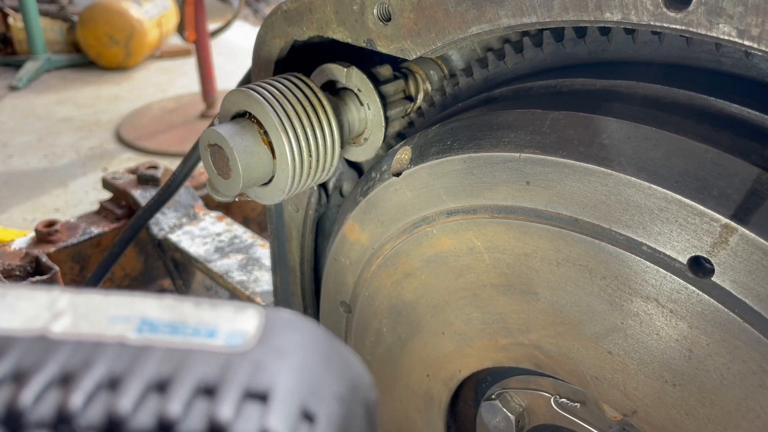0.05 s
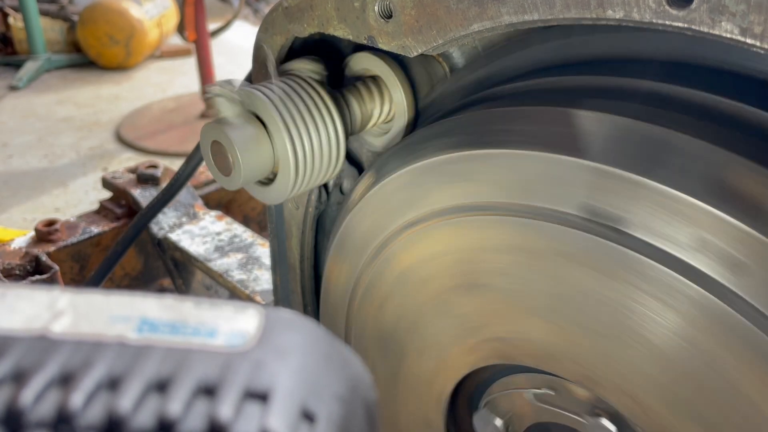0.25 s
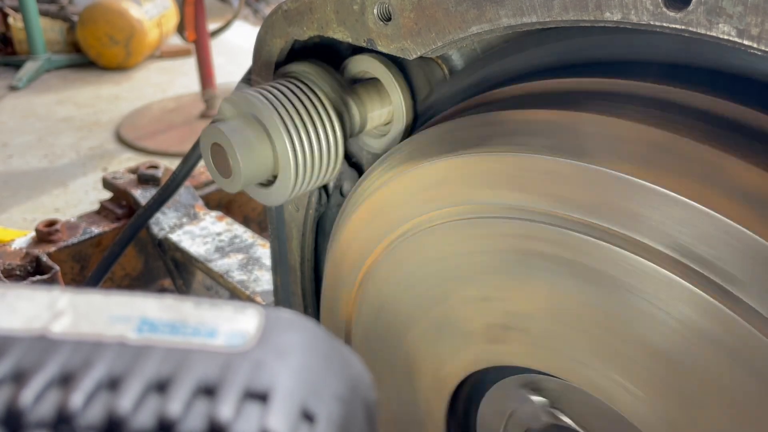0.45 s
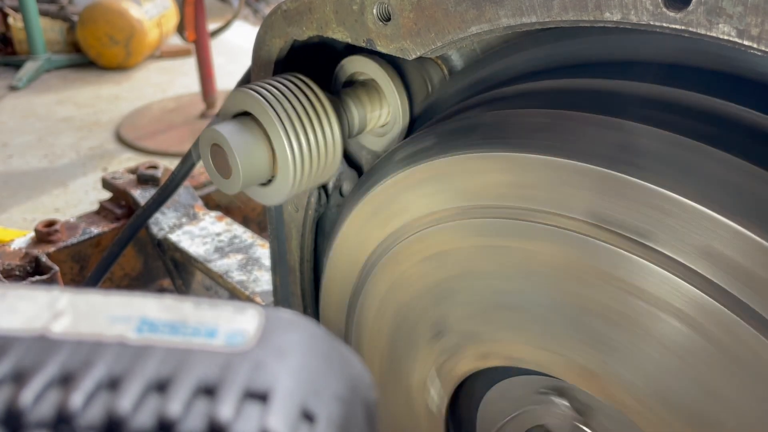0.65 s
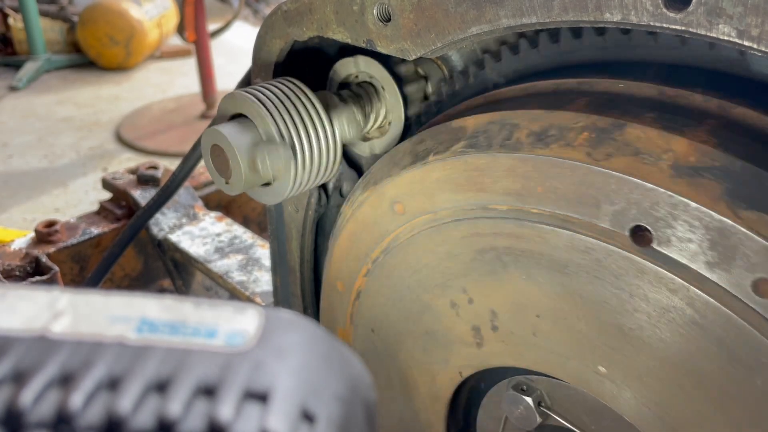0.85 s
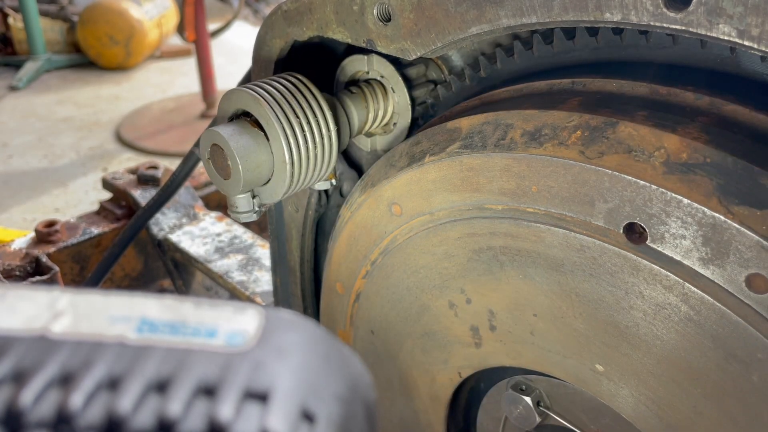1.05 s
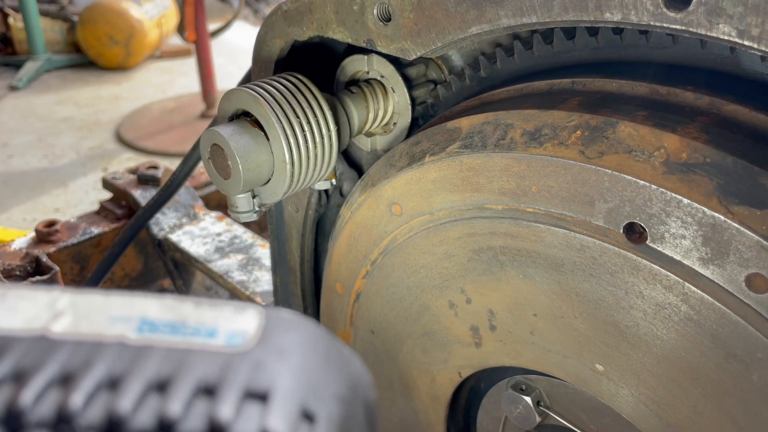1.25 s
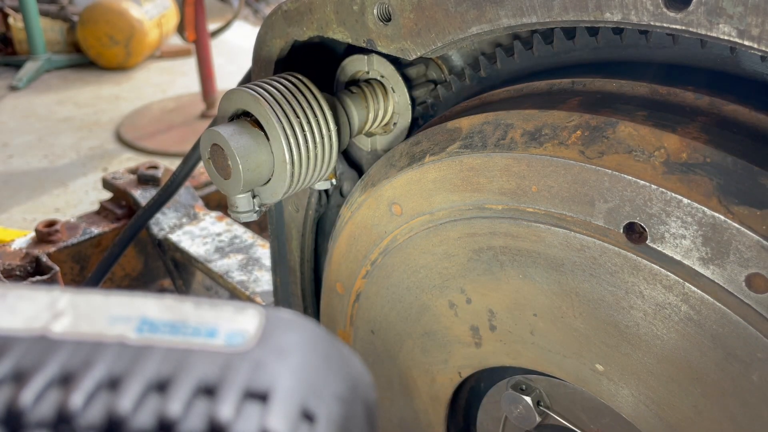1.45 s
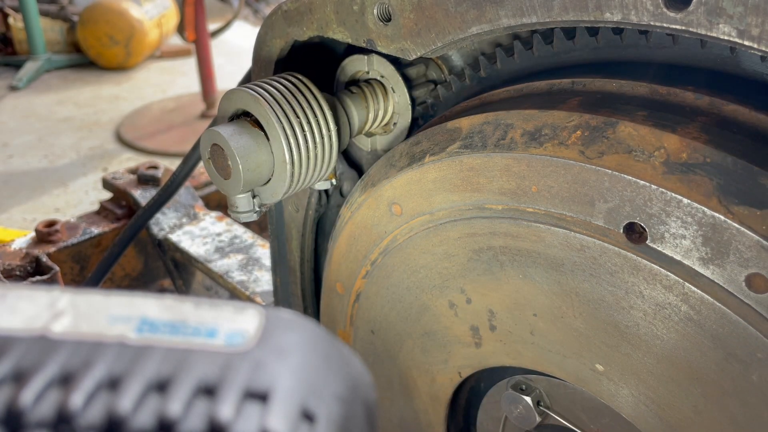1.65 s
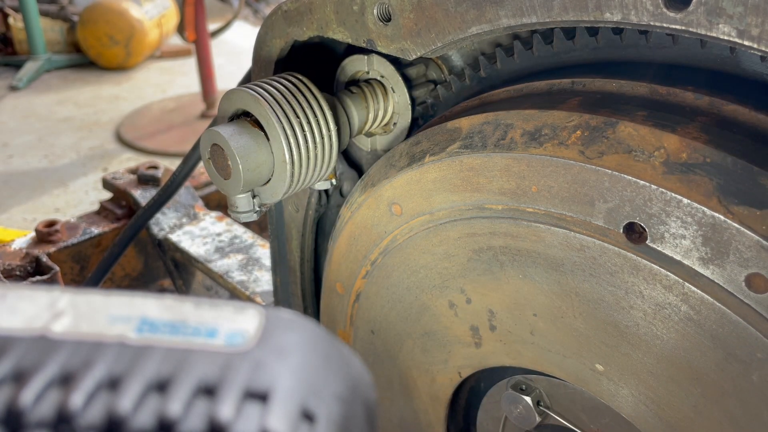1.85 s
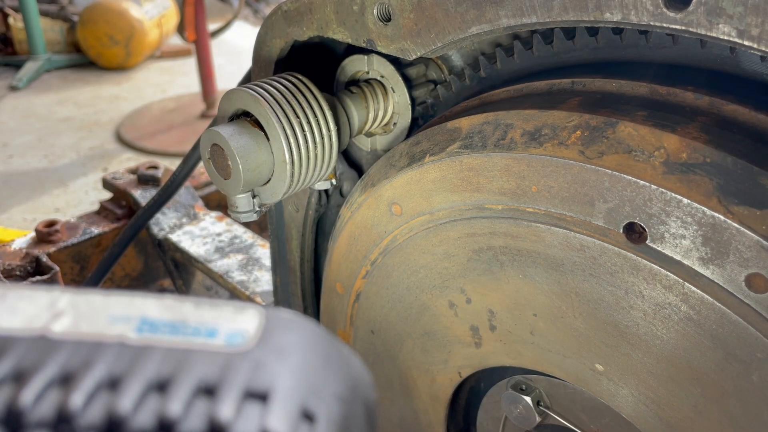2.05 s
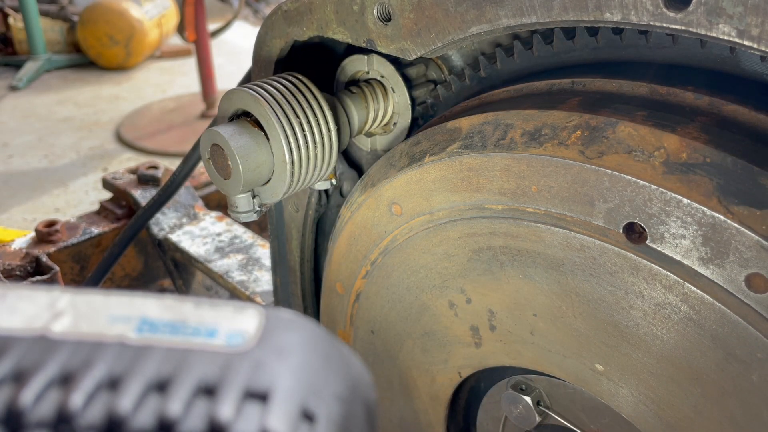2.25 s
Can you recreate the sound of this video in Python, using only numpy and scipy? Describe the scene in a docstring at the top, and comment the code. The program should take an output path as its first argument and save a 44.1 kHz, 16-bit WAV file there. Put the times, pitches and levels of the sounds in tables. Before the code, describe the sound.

An engine starter slams into a flywheel with a sharp metal clank and thud, grinds and whines for half a second, then disengages with a rattling clack. Heard close up in a workshop, over a faint distant rumble.

```python
"""An inertia starter on a bare engine in a workshop, heard from close by.
The motor kicks; its pinion slams into the ring gear with a clank and a falling thud.
The teeth grind, whine and set the steel singing, then the pinion is thrown back with a
rattling clack and the stand shudders. The room rings out over a dull, distant rumble."""
import sys
import numpy as np
from scipy import signal
from scipy.fft import rfft, irfft
from scipy.io import wavfile
from scipy.ndimage import uniform_filter1d

SR = 44100
rng = np.random.default_rng(int(sys.argv[2]) if len(sys.argv) > 2 else 0)


def digitize_waveform(pressure):
    """Quantize a signal to 16-bit integers and store it at the path in sys.argv[1].

    Rows of a 2-D input are taken as channels; values are limited to [-1, 1].
    """
    field = np.atleast_2d(pressure).T
    bounded = np.clip(field, -1, 1)
    quanta = np.round(bounded * 32767).astype(np.int16)
    wavfile.write(sys.argv[1], SR, quanta)


N = 105840
T = np.arange(N) / SR

# rumble spectrum: freq_hz, relative_db
RUMBLE_COLOUR = [(20, -25.5), (32, -15), (60, -3.5), (105, -2.5), (160, -2.5), (260, -11), (380, -23),
                 (520, -19), (800, -8.5), (1100, -17.5), (1500, -28.5), (2200, -38.5), (5000, -49.5),
                 (16000, -66.5)]
# rumble envelope: time_s, level_db
RUMBLE_LEVEL = [(0, -53.5), (.17, -54.5), (1.0, -62.5), (1.75, -66), (2.0, -63), (2.2, -58), (2.4, -62.5)]
# rumble stereo width: freq_hz, side_to_mid_db
RUMBLE_WIDTH = [(60, -23), (250, -8), (800, 0.5), (3000, -3)]
# room tail spectrum: freq_hz, relative_db
ROOM_TAIL_COLOUR = [(70, -1.5), (130, 6.5), (220, 10), (320, 13.5), (520, 6), (900, 2.5), (1900, -5),
                    (3000, -2.5), (6000, 2.5), (11000, 0), (16000, -12)]
# starter stereo width: freq_hz, side_to_mid_db
STARTER_WIDTH = [(60, -25), (250, -16.5), (600, 0), (1200, -9), (2200, -11), (5000, -12), (12000, -19.5)]
# microphone balance: freq_hz, left_minus_right_db
MIC_PAN = [(100, -1), (350, 2), (800, 2.5), (1200, 1.5), (2100, 6.5), (3300, 4.5), (5500, 1.5),
           (9000, -0.5)]
# microphone phase: freq_hz, left_lead_rad
MIC_LEAD = [(60, 0), (650, 0.6), (1200, -0.48), (2300, -5.34), (3300, 2.36), (4000, -0.05), (5200, 0.37),
            (7200, -3.5), (11000, -5.5), (14600, -11.5)]
# stand shudder spectrum: freq_hz, relative_db
STAND_COLOUR = [(60, -30), (130, -11.5), (175, -1), (290, 2), (370, -6), (520, -17), (900, -22),
                (2000, -50)]
# frame shake envelope: time_s, level_db
FRAME_LEVEL = [(0, -60), (.19, -58), (.26, -37.5), (.35, -47), (.48, -51), (.55, -61.5), (.63, -60),
               (.76, -70), (.8, -55.5), (.85, -55), (.93, -81)]
# frame shake spectrum: freq_hz, relative_db
FRAME_COLOUR = [(20, -13.5), (40, -3), (56, 6.5), (85, -11), (150, -20.5), (300, -45.5)]
# motor kick spectrum: freq_hz, relative_db
MOTOR_COLOUR = [(60, -21.5), (200, -10), (420, -7.5), (600, -6.5), (850, -2.5), (1150, 3), (1500, -10),
                (2400, -22.5), (6000, -44.5)]
# gear and casting modes: freq_hz, relative_db, t60_s
STEEL_MODES = [(215, -10, 0.61), (400, -16, .09), (802, -8.5, .07), (945, -10.5, 0.11), (1183, -8.5, .25),
               (1302, -6.5, 0.1), (1471.6, -27, .8), (1575, -7.5, .05), (1700, -8, .05), (2108, -6, .09),
               (2307, -2, .04), (2565, -6.5, 0.035), (2862, -12, .14), (3370, -1.5, 0.08), (3875, -11, .05),
               (4460, -6.5, 0.057)]
# steel blows: start_s, crack_db, chatter_decay_s, knock_db
PINION_BLOWS = [(0.2235, -11, 0.0045, -18), (0.2291, -14, 0.0013, -16.5), (0.2358, -26.5, 0.0024, -23),
                (0.2517, -26.5, 0.0033, -38), (.2692, -14, .0015, -26), (0.5537, -28, 0.0022, -24.5),
                (0.5641, -29.5, 0.0013, -28.5), (.6445, -37, 0.0022, -37), (0.7029, -44.5, .004, -33),
                (0.7435, -19, .005, -20.5), (0.7482, -26.5, 0.0035, -27), (.7665, -31, .007, -26.5),
                (0.7808, -40.5, 0.0017, -34.5)]
# bright spectrum of a blow: freq_hz, relative_db
BLOW_CRACK_COLOUR = [(200, -20.5), (1000, 3), (2200, 2.5), (3000, 2), (3700, -3), (6000, -2), (8500, -1),
                     (11000, 1), (13000, -5.5), (16000, -17)]
# dull spectrum of a blow: freq_hz, relative_db
BLOW_KNOCK_COLOUR = [(50, -33.5), (170, -6.5), (350, -7.5), (560, -10.5), (950, 6.5), (1250, 1.5),
                     (1600, -5), (2300, -7.5), (4000, -31), (9000, -51)]
# singing envelopes: time_s, low_mode_db, high_mode_db
SINGING_LEVELS = [(.185, -69, -82), (.205, -27.5, -34.5), (.25, -39, -43.5), (.29, -35, -38.5),
                  (.35, -39, -33.5), (.402, -30, -21.5), (.418, -35, -41), (.44, -26.5, -30),
                  (.485, -33, -31), (.54, -42, -37), (.585, -23.5, -34.5), (.64, -38.5, -40),
                  (.66, -42, -55.5), (.695, -36.5, -60.5), (.714, -41, -33), (.745, -43.5, -38.5),
                  (.84, -48, -56.5), (1.0, -109, -109)]
# singing modes: pitch_hz, relative_db, high_envelope_share, wander_hz
SINGING_MODES = [(1169, -4, 0, 11.6), (2877, -5.5, 1, 9), (2895, -5, 1, 16), (3300, -6.5, 0.9, 9.8)]
# mesh whine partials: tooth_rate_multiple, relative_db
WHINE_PARTIALS = [(1, -9), (2, -12), (3, -10), (4, -10), (5, -6), (6, -6), (8, -14), (11, -15)]
# gear speed: time_s, tooth_rate_hz
TOOTH_RATE = [(.18, 300), (.25, 375), (.325, 392), (.37, 411), (.405, 414), (.452, 368), (.49, 402),
              (.515, 408), (.56, 376), (0.601, 393), (0.751, 370)]
# tooth contact envelopes: time_s, load_db, scrape_db
CONTACT_LEVELS = [(.182, -70, -79.5), (.2, -32, -31), (.218, -35, -40), (.25, -44, -46),
                  (.285, -33.5, -37.5), (.33, -28, -37), (.38, -27.5, -33), (.46, -30.5, -38.5),
                  (.495, -33.5, -38.5), (.512, -28, -34), (.538, -48, -51.5), (.57, -22.5, -33),
                  (.592, -35, -45.5), (.625, -47, -52.5), (.646, -41, -48), (.68, -55, -52),
                  (.705, -45, -52), (.74, -49, -41), (.79, -73, -74.5)]
# grinding spectrum: freq_hz, relative_db
TOOTH_GRIND_COLOUR = [(60, -24), (190, -21), (290, -7), (400, -4), (570, -14), (800, -2), (1080, 3),
                      (1420, -6), (1600, 0), (1800, -1), (2070, 1), (2280, 2), (2560, -3), (3300, -7),
                      (4200, -20), (8000, -45)]
# scraping spectrum: freq_hz, relative_db
TOOTH_SCRAPE_COLOUR = [(1500, -39.5), (3500, -8.5), (4500, 3.5), (5500, 2.5), (7000, 0), (9000, -2),
                       (11000, 2.5), (13000, -6), (16000, -26)]


def from_db(db):
    """Decibels to gain."""
    return 10 ** (np.asarray(db) / 20)


def unit_rms(x):
    """Scale to unit rms."""
    return x / np.sqrt(np.mean(x ** 2) + 1e-20)


def per_sample(rows):
    """Columns of a time table, interpolated per sample."""
    time_s, *columns = np.transpose(rows)
    return [np.interp(T, time_s, column) for column in columns]


def envelopes(rows):
    """Level columns as gains, fading after the last row."""
    fade = np.exp(-np.maximum(T - rows[-1][0], 0) * 20)
    return [from_db(db) * fade for db in per_sample(rows)]


def per_bin(rows):
    """A frequency table on the bins of a double-length FFT."""
    hz, value = np.transpose(rows)
    bin_hz = np.maximum(np.arange(N + 1) * SR / (2 * N), 1)
    return np.interp(np.log(bin_hz), np.log(hz), value)


def colour(x, spectrum):
    """Minimum-phase filter; white input keeps its power."""
    cepstrum = irfft(np.log(unit_rms(from_db(per_bin(spectrum)))))
    cepstrum[1:N] *= 2
    cepstrum[N + 1:] = 0
    return irfft(rfft(x, 2 * N) * np.exp(rfft(cepstrum)))[..., :N]


def stereo_noise(width=STARTER_WIDTH):
    """White mid/side noise, its width set per frequency."""
    mid, side = rng.standard_normal((2, N))
    side_gain = from_db(per_bin(width))
    both = rfft(mid, 2 * N) + side_gain * rfft(side, 2 * N) * [[1], [-1]]
    return irfft(both / np.sqrt(1 + side_gain ** 2))[:, :N]


def drift(rate_hz=70):
    """Smooth random motion, unit rms."""
    pole = np.exp(-2 * np.pi * rate_hz / SR)
    smooth = signal.lfilter([1], [1, -2 * pole, pole * pole], rng.standard_normal(2 * N))
    return unit_rms(smooth[N:])


def levelled(x, window_samples=900):
    """Hold the running rms at one."""
    power = np.mean(np.atleast_2d(x) ** 2, axis=0)
    return x / np.sqrt(uniform_filter1d(power, window_samples) + 1e-9)


def decaying(noise, t60_s):
    """Exponential noise decay, unit energy."""
    return unit_rms(noise * from_db(-60 * np.minimum(T / t60_s, 4))) / np.sqrt(N)


def convolve(x, response):
    """Apply a stereo impulse response."""
    return signal.fftconvolve(np.atleast_2d(x), response, axes=1)[:, :N]


def dense_ring(x, spectrum, ring_s, taps=4096):
    """Excite a short, whitened stereo noise decay, then colour it."""
    response = decaying(stereo_noise(), ring_s)[:, :taps]
    for _ in range(4):
        bins = rfft(response, 2 * taps)
        response = irfft(bins / (np.abs(bins) + 1e-12))[:, :taps] * (T[:taps] < ring_s)
    return colour(convolve(x, response), spectrum)


def distant_rumble(crossover_hz=340, rush_db=-66):
    """Low rumble that ebbs and swells under a faint, steady rush."""
    bands = []
    for kind in ("low", "high"):
        noise = colour(stereo_noise(RUMBLE_WIDTH), RUMBLE_COLOUR)
        sos = signal.butter(2, crossover_hz, kind, fs=SR, output="sos")
        bands.append(unit_rms(signal.sosfilt(sos, noise)))
    rumble, rush = bands
    rumble_db, = per_sample(RUMBLE_LEVEL)
    return from_db(rumble_db) * rumble + from_db(rush_db) * rush


def workshop(x, early_db=-14.5, tail_db=-20.5, split_hz=4000):
    """Near reflections and a faint, boomy tail."""
    near, far = rng.standard_normal((2, 2, N))
    far = colour(far, ROOM_TAIL_COLOUR)
    low = signal.sosfilt(signal.butter(2, split_hz, fs=SR, output="sos"), far)
    early = decaying(near, t60_s=.16)
    tail = decaying(low, t60_s=.7) + from_db(-10.5) * decaying(far - low, t60_s=.75)
    return convolve(x, from_db(early_db) * early + from_db(tail_db) * tail)


def microphones(x):
    """Level and phase differences of close sound across the pair."""
    left = from_db(per_bin(MIC_PAN) / 2) * np.exp(.5j * per_bin(MIC_LEAD))
    return irfft(rfft(x, 2 * N) * np.array([left, 1 / left]))[:, :N]


def stand_shudder(start_s=.745, rise_s=.018, level_db=-38, decay_db_per_s=114):
    """Low after-ring of the stand as the pinion is thrown back."""
    age_s = np.maximum(T - start_s, 0)
    level = np.minimum(age_s / rise_s, 1) * from_db(level_db - decay_db_per_s * age_s)
    return level * levelled(colour(stereo_noise(), STAND_COLOUR), window_samples=1500)


def frame_shake():
    """Deep shaking of the frame, strongest just after engagement."""
    level, = envelopes(FRAME_LEVEL)
    return level * levelled(colour(stereo_noise(), FRAME_COLOUR), window_samples=2500)


def frame_thud(start_s=.2335, start_hz=680, end_hz=65, fall_s=.0033, hold_s=.015, decay_db_per_s=350.5):
    """The engagement shock runs through the frame, highs first, down to the frame's own boom."""
    age_s = np.maximum(T - start_s, 0)
    pitch_hz = end_hz + (start_hz - end_hz) * np.exp(-age_s / fall_s)
    phase = 2 * np.pi * np.cumsum(pitch_hz * (age_s > 0)) / SR
    tone = np.sin(phase) + from_db(-14.5) * np.sin(1.75 * phase)
    return tone * from_db(-8.5 - decay_db_per_s * np.maximum(age_s - hold_s, 0))


def motor_kick(start_s=.1872, attack_s=.007, hold_until_s=.232, release_s=.011, level_db=-22.5):
    """The motor jerks into motion and spins the pinion along its screw."""
    attack = np.clip((T - start_s) / attack_s, 0, 1)
    release = np.exp(-np.maximum(T - hold_until_s, 0) / release_s)
    return from_db(level_db) * attack * release * levelled(colour(stereo_noise(), MOTOR_COLOUR))


def steel_ring(force):
    """Gears and casting ring: one two-pole resonator per mode."""
    out = 0
    for hz, db, t60_s in STEEL_MODES:
        radius, angle = from_db(-60 / (t60_s * SR)), 2 * np.pi * hz / SR
        unit_energy_gain = np.sin(angle) * np.sqrt(2 * (1 - radius ** 2))
        feedback = [1, -2 * radius * np.cos(angle), radius ** 2]
        out += from_db(db) * signal.lfilter([0, unit_energy_gain], feedback, force + 1e-18)
    return out


def pinion_blows():
    """Each blow is a brief chatter of contacts: bright crack, dull knock, ringing steel."""
    chatter = levelled(rng.standard_normal(N) ** 3, window_samples=60)
    crack_force, knock_force = 0, 0
    for start_s, crack_db, decay_s, knock_db in PINION_BLOWS:
        contact = chatter * (T >= start_s) * np.exp(-np.maximum(T - start_s, 0) / decay_s)
        crack_force += from_db(crack_db) * contact
        knock_force += from_db(knock_db) * contact
    crack = dense_ring(crack_force, BLOW_CRACK_COLOUR, ring_s=.022)
    knock = dense_ring(knock_force, BLOW_KNOCK_COLOUR, ring_s=.08)
    return from_db(4.5) * crack + from_db(5.5) * knock + from_db(-9.5) * steel_ring(knock_force)


def gear_singing(max_pull=.55, full_load_db=-30, flutter_db=2.2):
    """Rubbing flanks keep modes singing; load drags each toward a nearby mesh harmonic."""
    low, high = envelopes(SINGING_LEVELS)
    load, _ = envelopes(CONTACT_LEVELS)
    tooth_hz, = per_sample(TOOTH_RATE)
    median_tooth_hz = np.median([hz for _, hz in TOOTH_RATE])
    pull = max_pull * np.minimum(load / from_db(full_load_db), 1)
    out = 0
    for mode_hz, db, high_share, wander_hz in SINGING_MODES:
        harmonic_hz = round(mode_hz / median_tooth_hz) * tooth_hz
        drag_hz = pull * (harmonic_hz - mode_hz) * (1 - .8 * high_share)
        pitch_hz = mode_hz + drag_hz + wander_hz * drift()
        level = low ** (1 - high_share) * high ** high_share * from_db(db + flutter_db * drift())
        out += np.sqrt(2) * level * np.sin(2 * np.pi * np.cumsum(pitch_hz) / SR)
    return out * (T > SINGING_LEVELS[0][0])


def gear_whine(gain_db=-2, flutter_db=3):
    """Harmonics of the tooth rate, bending with gear speed."""
    tooth_hz, = per_sample(TOOTH_RATE)
    load, _ = envelopes(CONTACT_LEVELS)
    phase = 2 * np.pi * np.cumsum(tooth_hz) / SR
    tones = 0
    for multiple, db in WHINE_PARTIALS:
        partial = np.sin(multiple * (phase + rng.uniform(0, 2 * np.pi)))
        tones += partial * from_db(db + flutter_db * drift())
    return from_db(gain_db) * load * tones * (T > CONTACT_LEVELS[0][0])


def tooth_knocks(jitter_teeth=.022, spread_db=2.5):
    """One impulse per tooth, uneven in timing and strength."""
    tooth_hz, = per_sample(TOOTH_RATE)
    teeth_passed = np.cumsum(tooth_hz) / SR
    teeth = np.arange(1, int(teeth_passed[-1]))
    lateness, strength = rng.standard_normal((2, len(teeth)))
    hit_samples = np.searchsorted(teeth_passed, teeth + jitter_teeth * lateness)
    knocks = np.zeros(N)
    knocks[np.minimum(hit_samples, N - 1)] = from_db(spread_db * strength)
    return unit_rms(knocks)


def gear_grind(grits_per_s=2200):
    """Teeth, with grit between their flanks, knock, scrape and ring the casting."""
    grit = unit_rms((rng.random(N) < grits_per_s / SR) * rng.standard_normal(N))
    knocks = tooth_knocks()
    force = knocks + from_db(-4.5) * grit
    friction = knocks + from_db(1.5) * grit
    load, scrape_level = envelopes(CONTACT_LEVELS)
    grind = from_db(2.5) * load * levelled(dense_ring(force, TOOTH_GRIND_COLOUR, ring_s=.016))
    scrape = from_db(-1) * scrape_level * levelled(dense_ring(friction, TOOTH_SCRAPE_COLOUR, ring_s=.007))
    ring = from_db(-8.5) * load * levelled(steel_ring(force))
    return (grind + scrape + ring) * (T > CONTACT_LEVELS[0][0])


def scene():
    """Rumble, frame and stand, and the starter; only the starter feeds the room."""
    background = distant_rumble()
    structure = frame_thud() + frame_shake() + stand_shudder()
    starter = motor_kick() + pinion_blows() + gear_grind() + gear_whine() + gear_singing()
    return background + workshop(starter) + microphones(structure + starter)


def record(dry):
    """Soft clip, then a steep low-pass."""
    stopband_db, stopband_hz = 70, 17300
    lowpass = signal.cheby2(12, stopband_db, stopband_hz, fs=SR, output="sos")
    return signal.sosfilt(lowpass, np.tanh(dry))


dry = scene()
out = record(dry)
digitize_waveform(out)
```